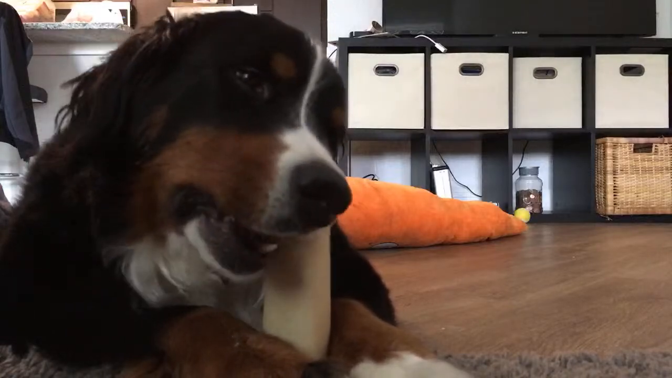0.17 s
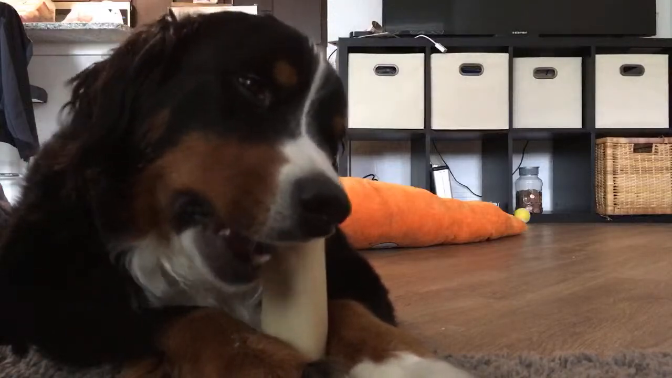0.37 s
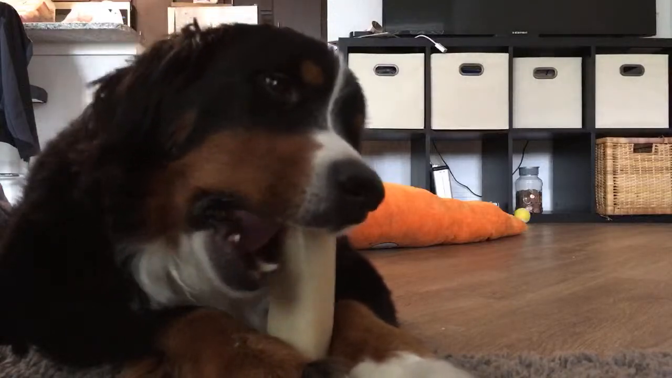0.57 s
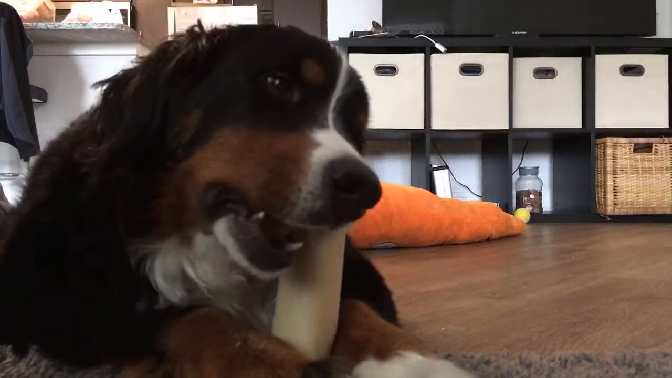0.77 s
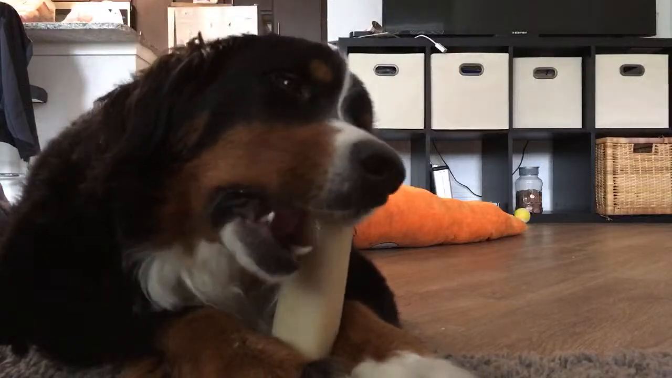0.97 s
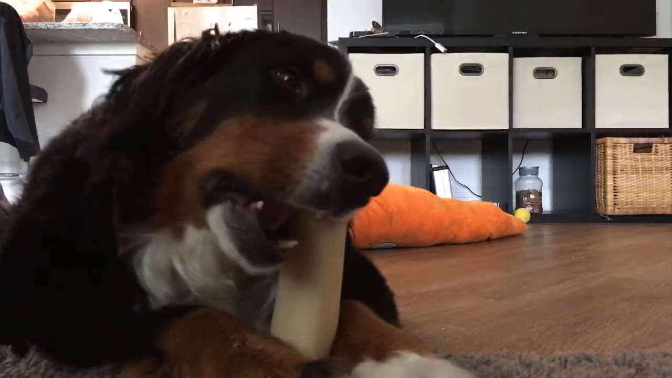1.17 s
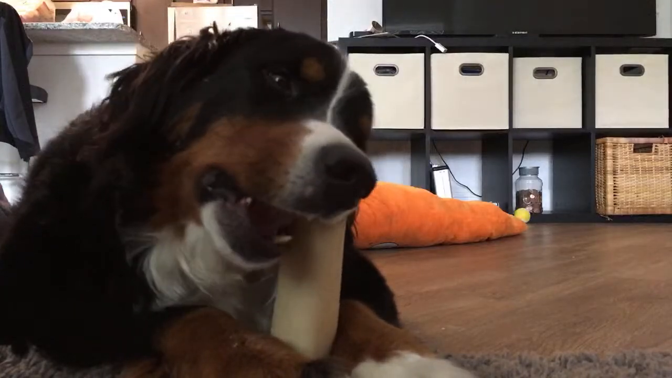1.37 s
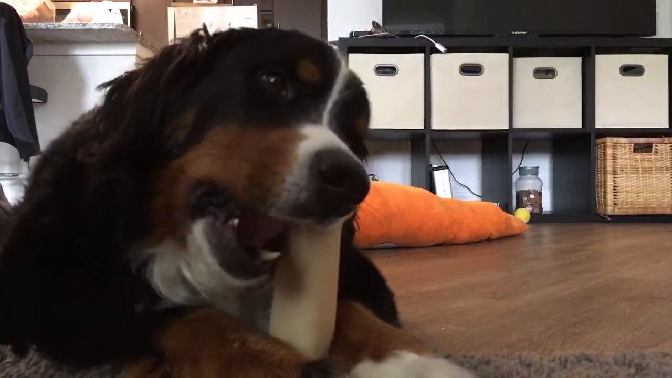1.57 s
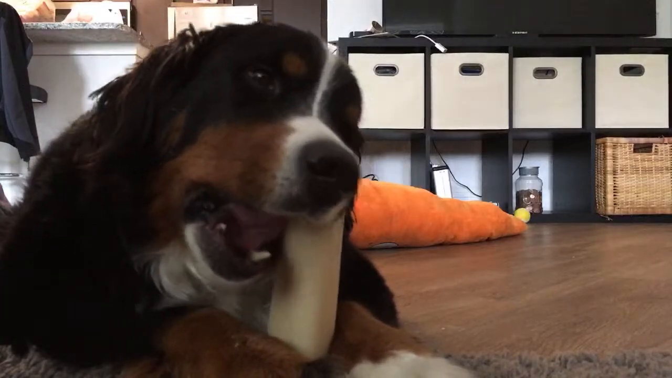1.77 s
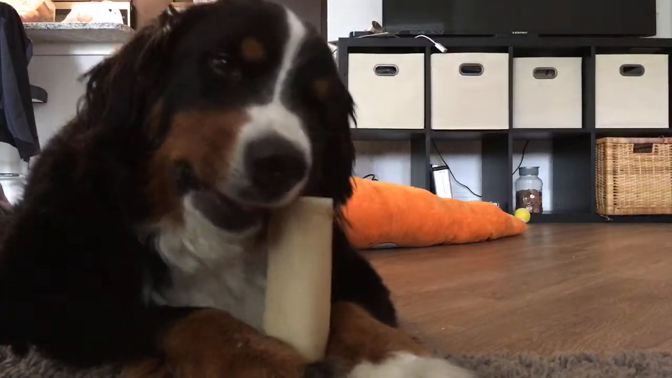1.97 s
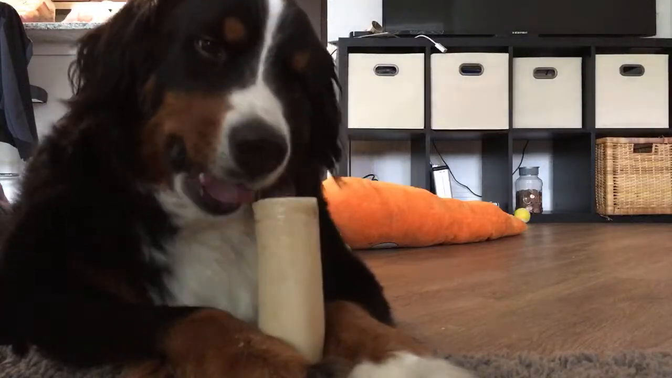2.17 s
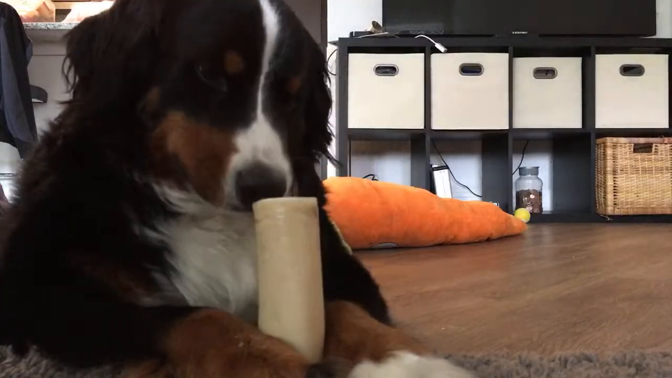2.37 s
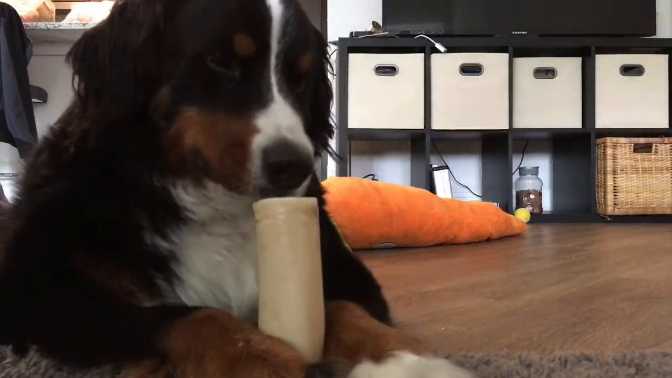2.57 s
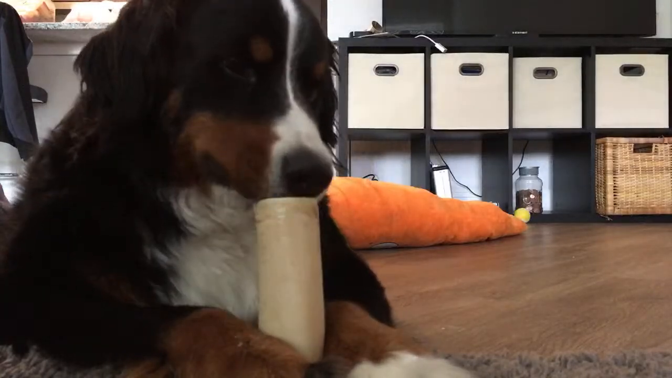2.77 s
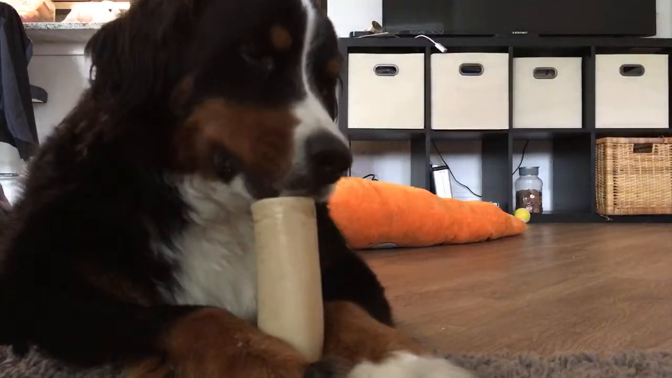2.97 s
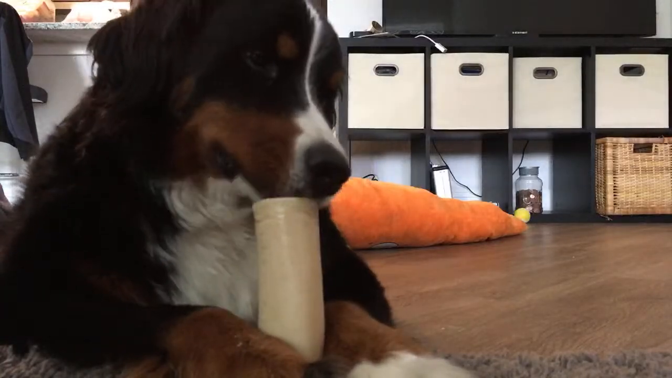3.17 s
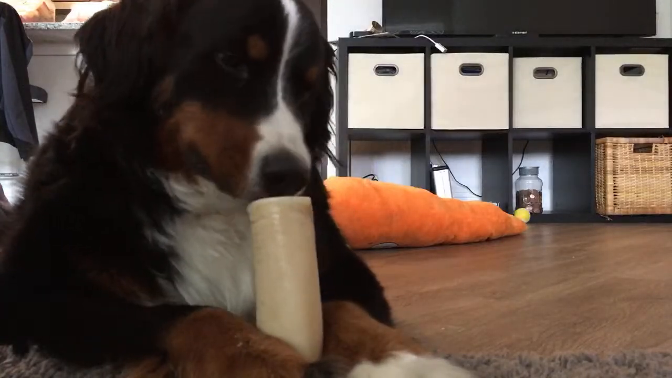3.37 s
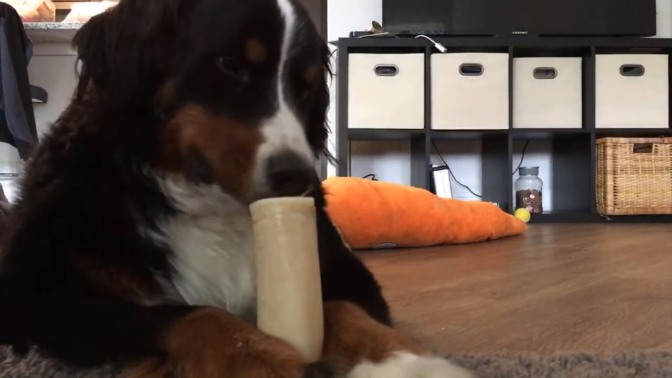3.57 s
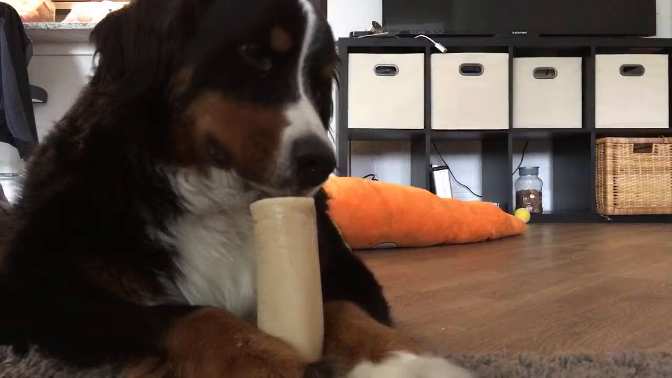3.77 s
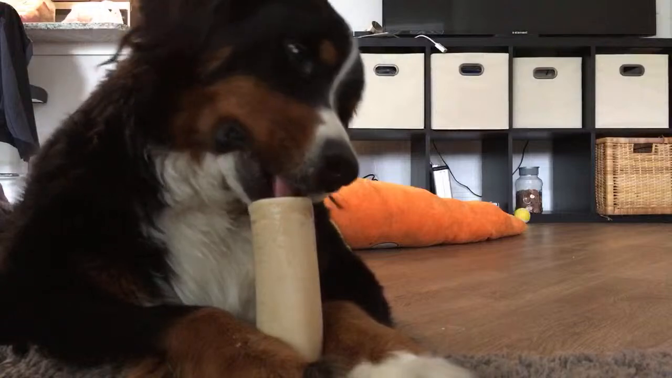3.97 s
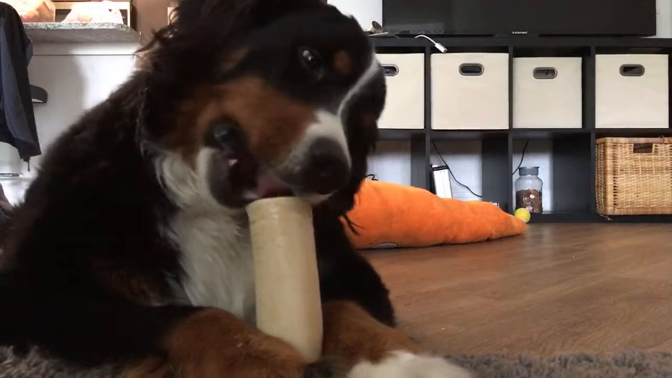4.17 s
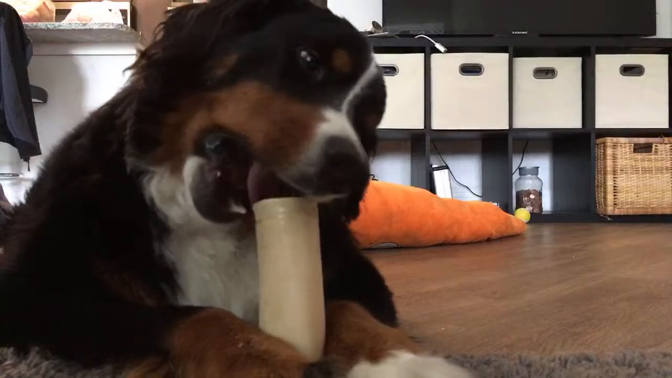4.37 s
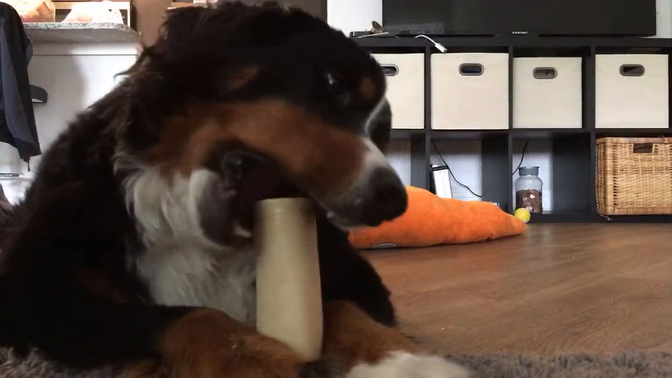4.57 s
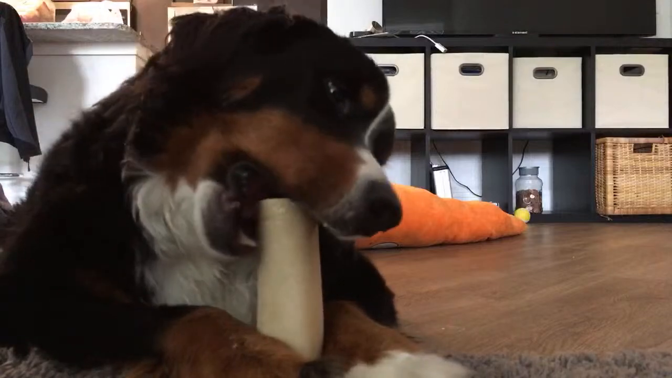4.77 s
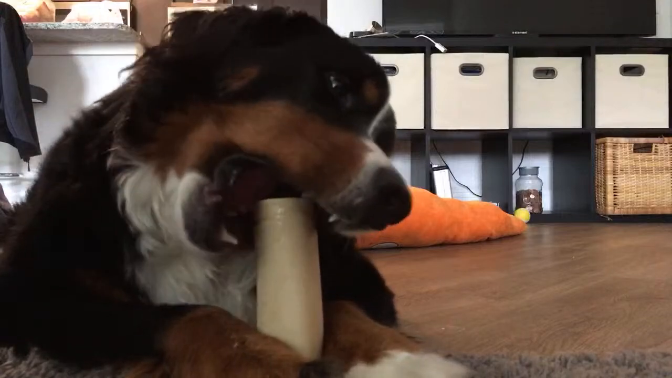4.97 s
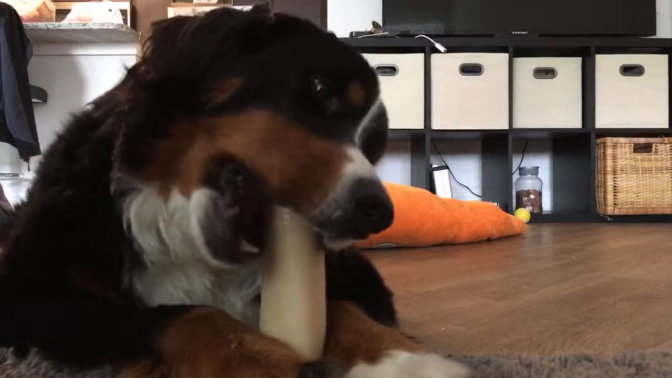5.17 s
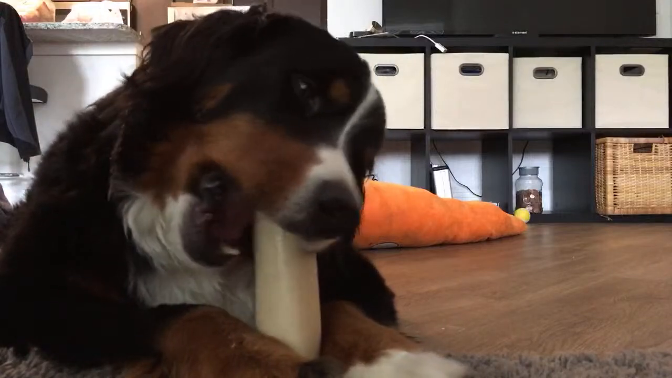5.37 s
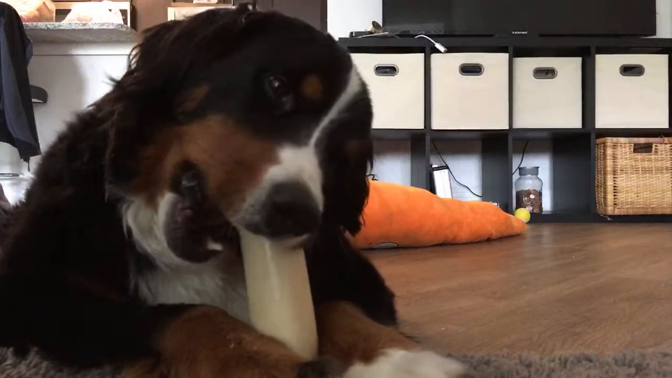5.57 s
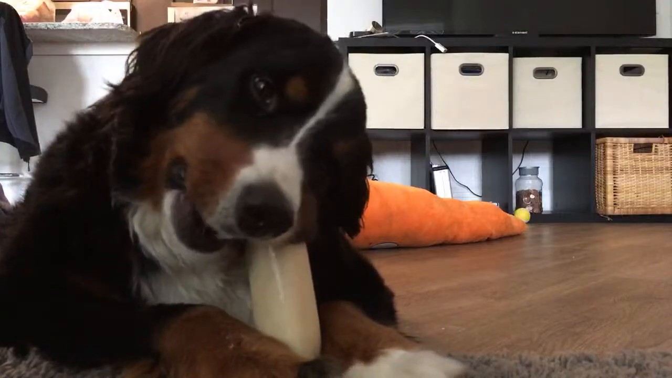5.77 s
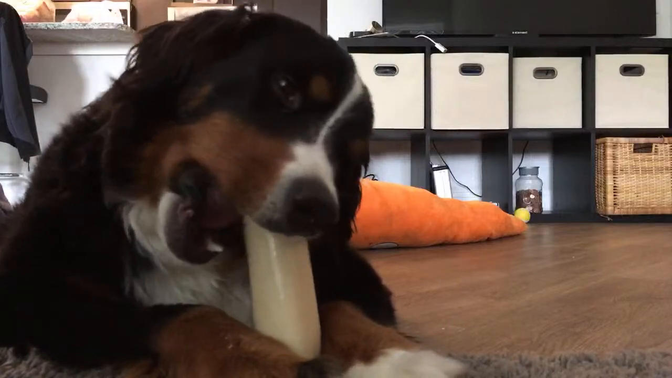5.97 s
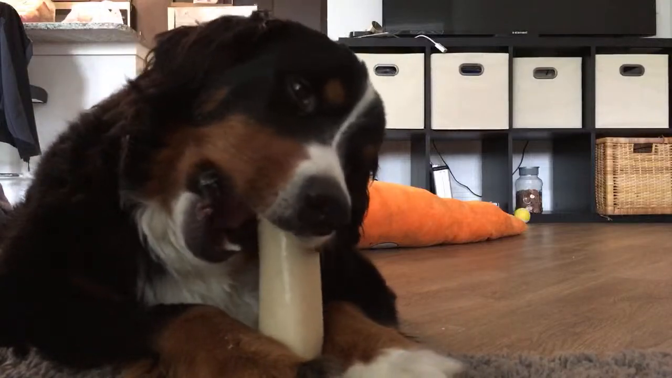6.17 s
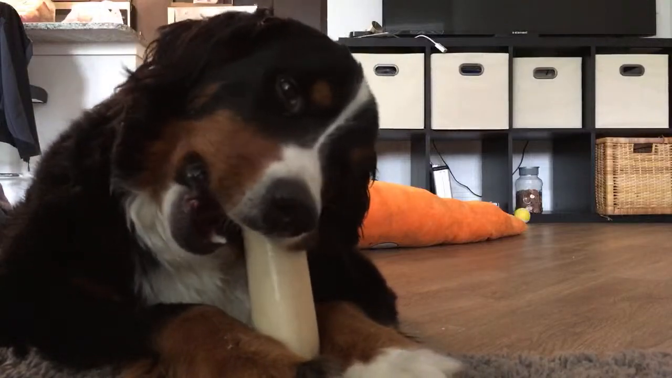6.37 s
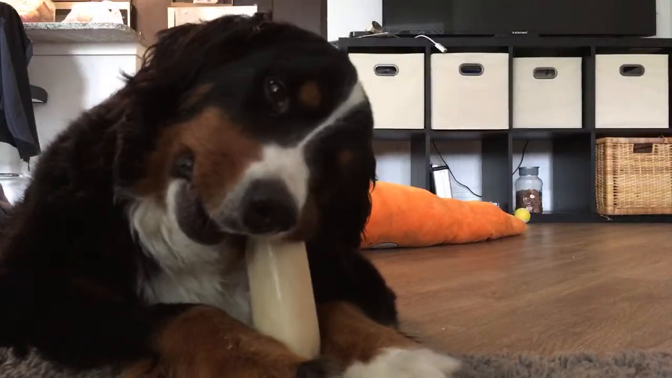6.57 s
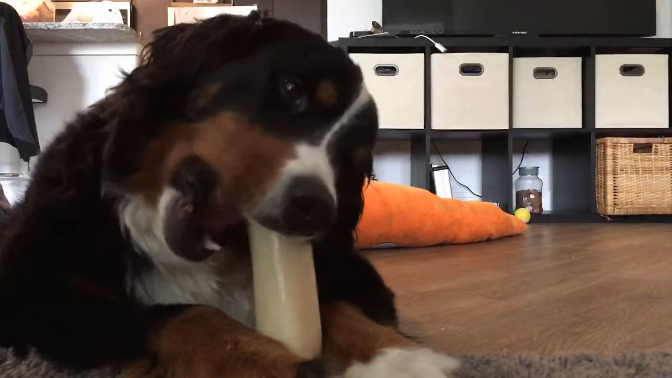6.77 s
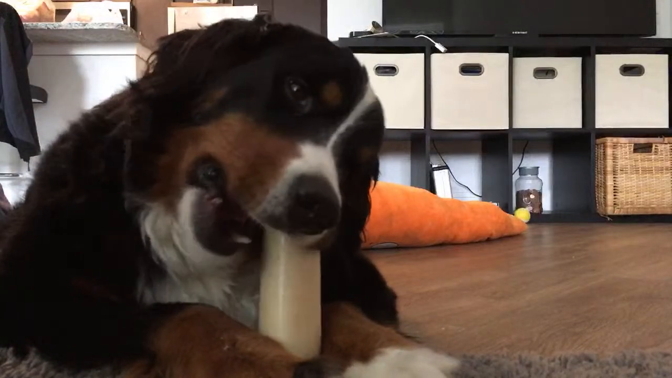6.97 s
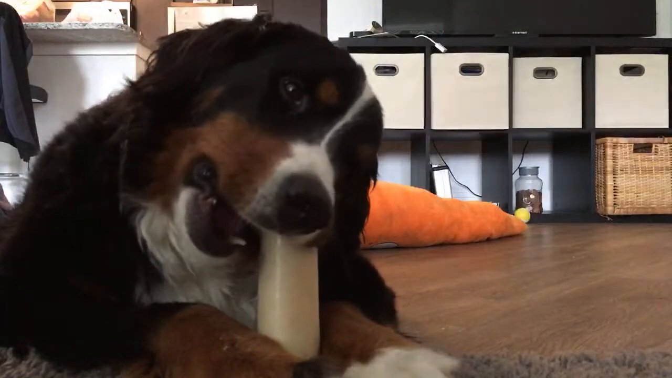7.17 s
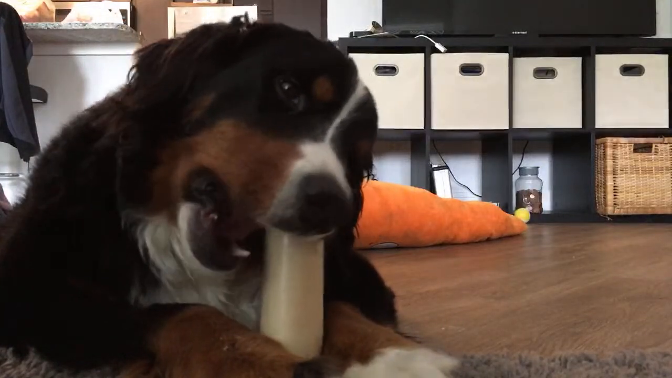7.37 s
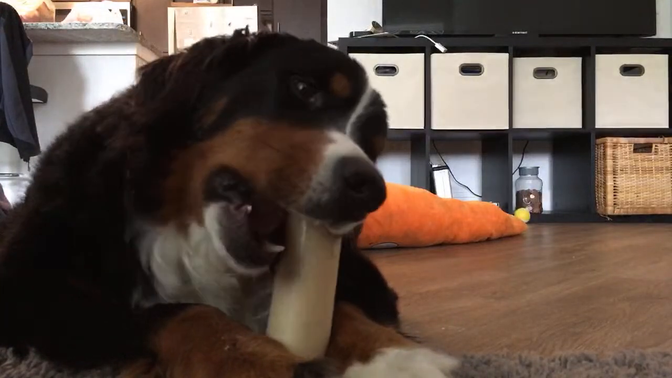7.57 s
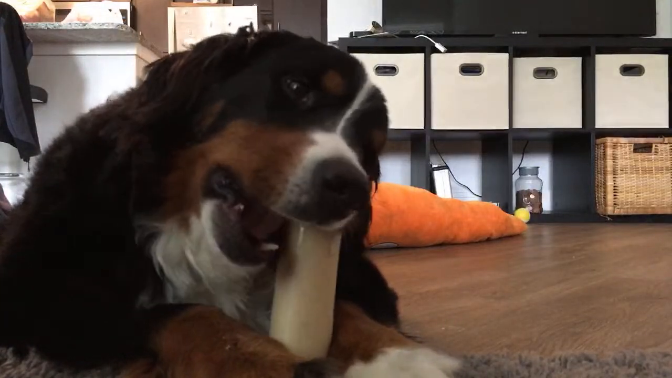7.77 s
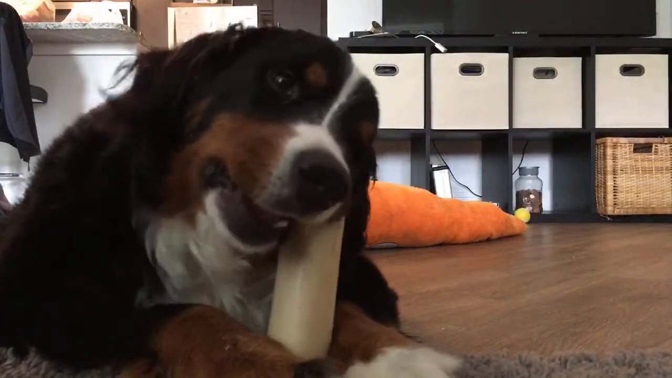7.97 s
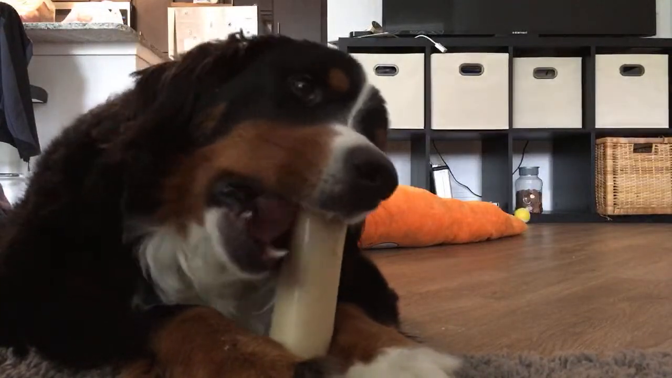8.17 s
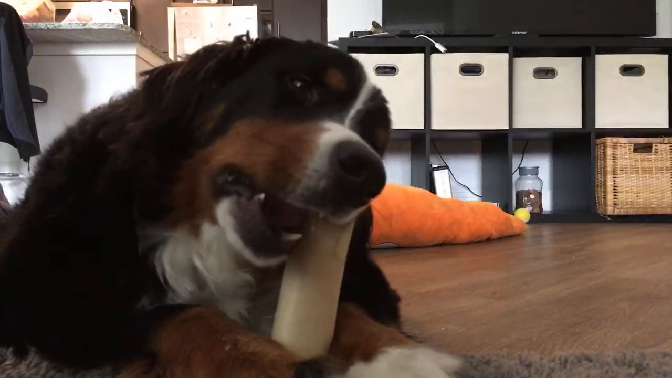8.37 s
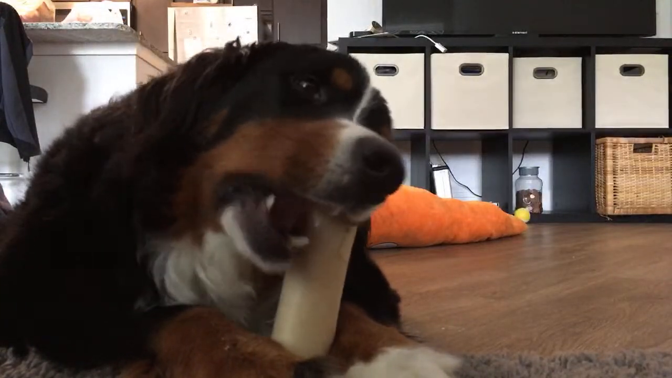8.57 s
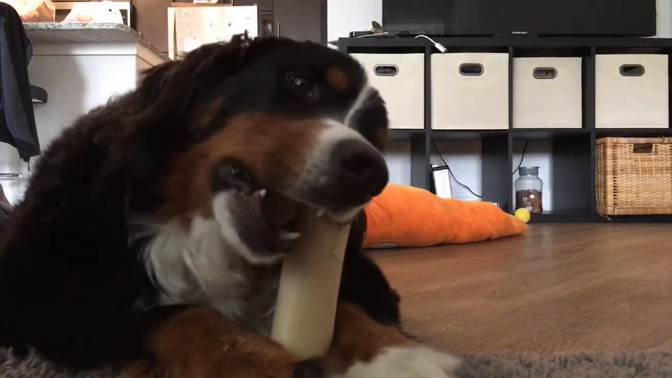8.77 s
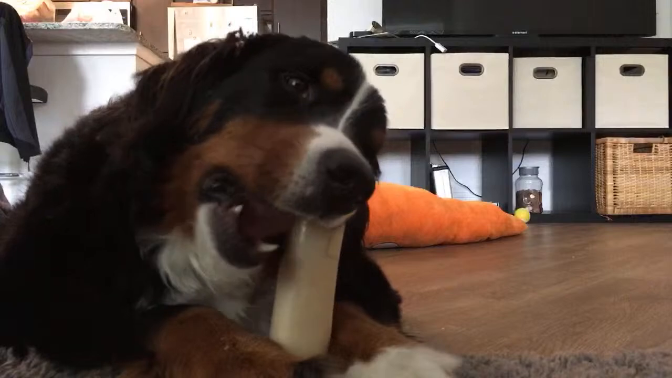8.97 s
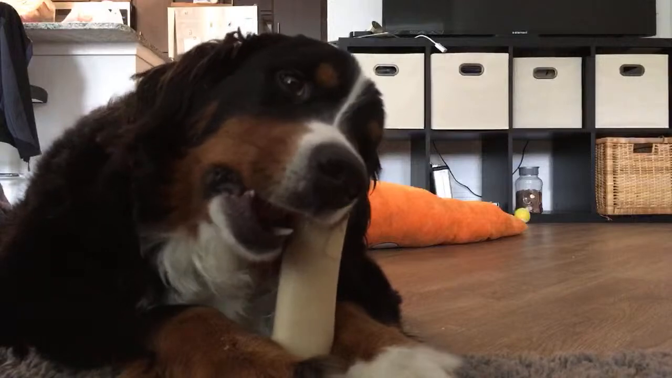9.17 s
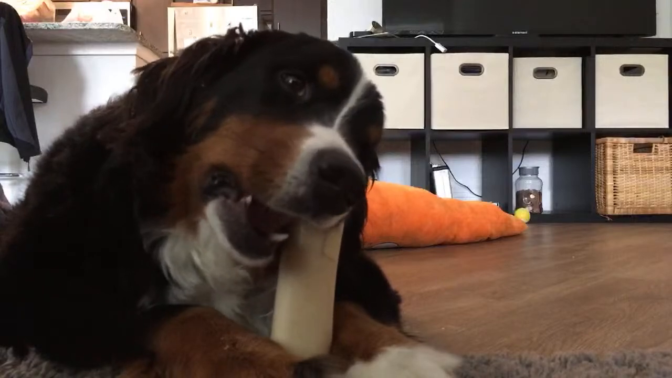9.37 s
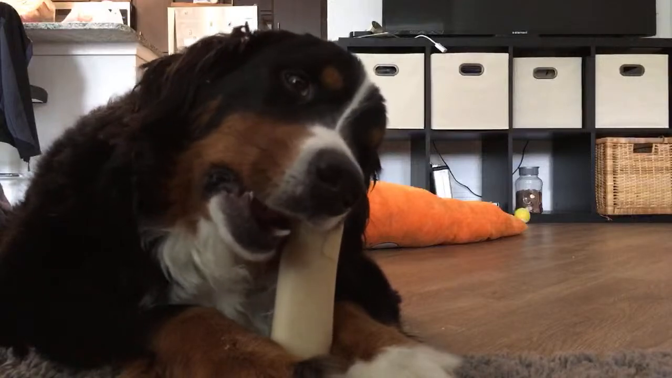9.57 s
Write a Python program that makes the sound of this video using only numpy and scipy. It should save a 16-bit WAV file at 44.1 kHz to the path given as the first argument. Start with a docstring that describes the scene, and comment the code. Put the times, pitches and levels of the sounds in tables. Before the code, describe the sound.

Over a steady low appliance hum and thin microphone hiss, a dog works at a chew bone in a slightly echoing room. Small tooth clicks and scrapes lead to a sharp crack, then quieter licking and lip smacks. The gnawing picks up with hollow knocks and soft bumps on the floor, until a second, louder crunching crack, after which everything is a little quieter.

```python
"""Dog gnawing a chew bone.

A big dog on a living-room floor gnaws a hard, hollow bone. Teeth scrape, click and knock, the wet mouth
smacks, and twice the bone cracks: bursts of tiny slips and fractures, coloured by its resonances. Jolts
ring the floor and the room echoes. An appliance hums; the microphone's electronics hiss and tick faintly.
The level dips briefly once, and gain control ducks after the loudest crack."""
import sys
import numpy as np
from scipy import signal
from scipy.fft import rfft, irfft, next_fast_len
from scipy.io import wavfile
from scipy.ndimage import uniform_filter1d

SR = 44100
rng = np.random.default_rng(int(sys.argv[2]) if len(sys.argv) > 2 else 0)


def put_to_file(sound):
    """Save the sound as 16-bit audio at rate SR, in the file named by the first command-line argument."""
    columns = np.atleast_2d(sound).T  # one column per channel
    safe = np.clip(columns, -1, 1)
    whole_steps = np.round(safe * 32767)
    wavfile.write(sys.argv[1], SR, whole_steps.astype(np.int16))


N = 424683
TIME = np.arange(N) / SR

# appliance tones: freq_hz, rms_db
HUM_TONES = [(119.9, -54), (166.1, -42.5), (796.7, -77.5)]
# moving air: freq_hz, relative_density_db
AIR_SPECTRUM = [(25, -36.5), (45, -28), (62, -19.5), (82, -6), (102, -7), (150, 2), (210, -.5), (280, -7.5),
                (370, -14.5), (470, -23), (1100, -31), (2200, -37), (5000, -46), (15000, -62.5)]
# electronic hiss: freq_hz, relative_density_db
HISS_SPECTRUM = [(1500, -20.5), (4000, -11.5), (7800, -19.5), (8400, -2), (11000, 2.5), (12500, -5.5),
                 (14200, -8.5), (15600, -4.5)]
# bone resonances: freq_hz, width_hz, boost_db
BONE_MODES = [(685, 130, 4), (1063, 270, 7.5), (1335, 40, 4.5), (2340, 110, 5), (3570, 230, 5.5),
              (4250, 300, 2), (6420, 160, 1), (8436, 230, 4), (8950, 450, 7.5), (9680, 300, 6.5)]
# knock, snap and splinter bands: low_hz, high_hz
CONTACT_BANDS = [(450, 2000), (2000, 7500), (7900, 13000)]
# tooth sliding on the bone: start_s, length_s, relative_db, pitch_hz
TOOTH_SCRAPES = [(0, 0.06, -56, 2970), (.414, 0.049, -57.5, 3700), (.807, 0.046, -63.5, 4300),
                 (3.668, 0.041, -63, 5600), (5.802, .035, -59, 3760), (6.063, 0.062, -64.5, 3620),
                 (7.949, 0.026, -41, 2670), (8.663, .04, -67.5, 6000)]
# tongue and lips sliding: start_s, length_s, relative_db, pitch_hz
WET_LICKS = [(2.02, 0.021, -59.5, 6970), (3.099, 0.21, -59.5, 2790), (3.21, 0.083, -57, 4500),
             (5.52, .06, -65.5, 13900), (9.095, 0.073, -61, 13500), (9.507, .11, -61.5, 13500)]
# jaw activity: time_s, gain_db
JAW_EFFORT = [(0, -1), (1.5, -1), (1.9, -4), (2.7, -1), (4.3, -6.5), (4.8, -2), (6.3, -1.5), (7.3, -4.5),
              (9.63, -3)]
# tooth slipping on the rim: start_s, relative_db, pitch_hz, splinter_offset_db
RIM_CLICKS = [(0.2327, -52, 3130, 1), (0.421, -60.5, 3620, 7), (.4365, -46, 3630, -4),
              (0.4656, -61, 4610, -14), (1.1487, -63, 5560, 1), (1.371, -61, 4320, -8.5),
              (2.856, -60.5, 3230, 0), (3.0398, -60, 3210, -5), (3.4714, -61, 3620, -5),
              (3.698, -57, 5733, 0), (4.7084, -61, 4690, -8), (4.8151, -57, 2930, 0),
              (5.038, -59, 3300, -3), (5.6079, -60.5, 3790, 4), (5.8198, -55.5, 3790, -10),
              (6.1015, -59.5, 4940, 3), (6.5764, -61.5, 3700, 1), (6.964, -52.5, 3890, -11),
              (7.1057, -53.5, 3595, -8), (7.6785, -52, 3620, -20), (7.806, -58, 3000, -5),
              (8.3398, -61.5, 4520, -1.5), (8.8443, -47, 3600, -25.5), (9.259, -56, 3620, -3)]
# back tooth on the hollow shaft: start_s, relative_db, pitch_hz
SHAFT_KNOCKS = [(0.4492, -52, 716), (1.2346, -54.5, 1207), (5.1174, -54, 880), (5.127, -62, 930),
                (5.2357, -52.5, 564), (6.1297, -44.5, 754), (6.8952, -45, 607), (6.9112, -54, 690),
                (7.6224, -47.5, 855), (8.2661, -50, 870), (8.6066, -53, 1900), (8.8367, -48.5, 884)]
# two runs of fractures: start_s, crumble_s, pitch_hz, knock_db, snap_db, splinter_db
BONE_CRACKS = [(1.484, 0.00071, 8730, -34.5, -18, -12), (1.486, 0.001, 2430, -26.5, -20.5, -24),
               (1.4877, 0.001, 990, -33, -43, -27.5), (7.944, 0.003, 2720, -34, -27, -32.5),
               (7.9492, 0.0017, 2490, -41, -54, -33.5), (7.9567, 0.0022, 5900, -39.5, -39, -39),
               (7.9999, 0.0011, 3650, -49, -46, -51), (8.0168, .0014, 2090, -42, -53, -48.5)]
# lips and tongue smacking: start_s, relative_db
WET_SMACKS = [(2.2335, -60), (3.1049, -51), (3.1557, -49), (3.193, -49.5), (4.3658, -58), (4.6731, -58),
              (5.5166, -56), (5.814, -37.5), (7.0438, -54.5), (8.1529, -55.5)]
# bone shifting against paws and floor: start_s, impulse_db, push_s
BONE_SHOVES = [(.245, -14, .014), (1.156, -19, 0.0098), (1.234, -29.5, 0.0035), (1.251, -23, 0.011),
               (1.4874, -16.5, 0.0032), (5.819, -33, .0011), (7.9475, -6, 0.004), (7.965, -21, 0.00308),
               (7.993, -30.5, 0.0023), (8.019, -28, 0.0027), (8.845, -28.5, 0.0027), (9.271, -29.5, 0.0072)]
# floor resonances: freq_hz, gain_db, t60_s
FLOOR_RESONANCES = [(87, -18.5, 0.25), (150.7, -9.5, 0.11), (207.7, -1, 0.1), (251, -12.5, 0.25),
                    (347, -10.5, .05), (532, -13.5, 0.04)]
# room's diffuse tail: freq_hz, gain_db, t60_s
ROOM_TAIL = [(100, -11, .3), (300, -9, 0.32), (1100, -2.5, 0.37), (2500, -13, 0.47), (4960, -13, 0.53),
             (7000, -15.5, .42), (9500, -16.5, 0.29), (15000, -19, 0.33)]
# brief level dip: time_s, gain_db
LEVEL_DIP = [(6.3, 1), (6.33, -4), (6.358, -13.5), (6.37, 1)]

# band offsets by kind of contact: knock_db, snap_db, splinter_db
SCRAPE_COLOUR_DB, LICK_COLOUR_DB = (1.5, 0, -8), (-12, -11, 0)
CLICK_COLOUR_DB, KNOCK_COLOUR_DB, SMACK_COLOUR_DB = (-1.5, -0.5, -0.5), (0, -11.5, -18), (-26, -14, -1.5)


def from_db(db):
    return 10 ** (np.asarray(db) / 20)


def unit_rms(x):
    return x / np.sqrt(np.mean(x ** 2) + 1e-20)


def at_time(rows, time_s=TIME):
    return np.interp(time_s, *np.transpose(rows))


def at_hz(rows, hz, column=1):
    rows = np.array(rows)
    return np.interp(np.log(hz + 1e-9), np.log(rows[:, 0]), rows[:, column])


def bandpass(x, low_hz, high_hz, order=2):
    return signal.sosfilt(signal.butter(order, [low_hz, high_hz], "band", fs=SR, output="sos"), x)


def resonance(x, hz, width_hz):
    """Two-pole resonator, unity peak gain."""
    radius = np.exp(-np.pi * width_hz / SR)
    feedback = [1, -2 * radius * np.cos(2 * np.pi * hz / SR), radius ** 2]
    return signal.lfilter(np.array([1, 0, -1]) * (1 - radius ** 2) / 2, feedback, x + 1e-18)


def noise(spectrum):
    """Steady coloured noise, rms 1."""
    size = next_fast_len(N)
    gain = from_db(at_hz(spectrum, np.fft.rfftfreq(size, 1 / SR)))
    return unit_rms(irfft(rfft(rng.standard_normal(size)) * gain, size)[:N])


def drift(knots_per_s):
    """Slow random curve, spread near 1."""
    knots = rng.standard_normal(int(N / SR * knots_per_s) + 2)
    return np.interp(TIME * knots_per_s, np.arange(len(knots)), knots)


def add(out, start_s, sound):
    start = max(0, round(start_s * SR))
    out[start:start + len(sound)] += sound[:max(0, N - start)]


def appliance(waver_db=1.0, wander_rad=0.2, air_db=-47):
    """Motor and mains tones waver over the rumble of moving air."""
    hum = np.zeros(N)
    for hz, rms_db in HUM_TONES:
        amplitude = np.sqrt(2) * from_db(rms_db + waver_db * drift(5.5))
        hum += amplitude * np.sin(2 * np.pi * hz * TIME + wander_rad * drift(3.4))
    return hum + from_db(air_db) * noise(AIR_SPECTRUM)


def electronics(hiss_db=-68.5, tick_db=-72, pairs_per_s=29.97, gap_s=0.0034, jitter_s=0.00053):
    """Thin hiss and uneven pairs of tiny ticks."""
    ticks = np.zeros(N)
    for pair_s in np.arange(0.031, N / SR, 1 / pairs_per_s):
        for lag_s, db in (0, 0), (gap_s, -3):
            start_s = pair_s + lag_s + jitter_s * rng.standard_normal()
            add(ticks, start_s, from_db([db + 2 * rng.standard_normal()]))
    ticks = unit_rms(bandpass(ticks + 1e-18, 10000, 12500))
    return from_db(hiss_db) * noise(HISS_SPECTRUM) + from_db(tick_db) * ticks


def micro_slips(size, slips_per_s, spread_db=0.0):
    """Tiny slips as random impulses; spread makes a few much stronger."""
    strength = from_db(spread_db * np.minimum(rng.exponential(1, size), 4))
    polarity = rng.choice([-1, 1], size)
    return strength * polarity * (rng.random(size) < slips_per_s / SR)


def bone(force, vary_db=4.0):
    """Bone resonances colour the force, differently at each spot."""
    for hz, width_hz, boost_db in BONE_MODES:
        gain = from_db(boost_db + vary_db * rng.standard_normal())
        force = force + (gain - 1) * resonance(force, hz, width_hz)
    return force


def contact(force, pitch_hz, bands_db, window_s, pitch_gain=2.6, q=10.0):
    """Stiffness gives a contact its pitch; place and force set each band's rms over window_s."""
    ringing = bone(force + pitch_gain * resonance(force, pitch_hz, pitch_hz / q))
    out = np.zeros(len(force))
    for (low_hz, high_hz), db in zip(CONTACT_BANDS, bands_db):
        part = bandpass(ringing, low_hz, high_hz, order=3)
        out += part * from_db(db) * np.sqrt(window_s * SR / (np.sum(part ** 2) + 1e-20))
    return out


def scrapes_and_licks(trim_db=-6.5, slips_per_s=2500):
    """A sliding tooth or tongue makes a swell of tiny slips."""
    out, t = np.zeros(N), TIME[:SR // 5]
    for slides, colour_db in (TOOTH_SCRAPES, SCRAPE_COLOUR_DB), (WET_LICKS, LICK_COLOUR_DB):
        for start_s, length_s, db, pitch_hz in slides:
            swell = np.sqrt(np.abs(np.sin(np.pi * np.minimum(t / length_s, 1))))
            force = swell * micro_slips(len(t), slips_per_s)
            add(out, start_s, contact(force, pitch_hz, np.add(db, colour_db), length_s))
    return from_db(trim_db) * out


def nibbling(base_db=-72, ticks_per_s=90):
    """Faint, dull tooth ticks, louder as the jaw works harder."""
    ticks = bandpass(bone(micro_slips(N, ticks_per_s, spread_db=2.0)), 450, 2200)
    return from_db(base_db + at_time(JAW_EFFORT)) * unit_rms(ticks)


def light_clicks(base_db=-66, spread_db=5.5, pitch_hz=3800, spread_octaves=0.3, count=14):
    """Random light tooth slips, scaled by jaw effort; rows as in RIM_CLICKS."""
    starts_s = (np.arange(count) + rng.random(count)) / count * N / SR
    level_draw, pitch_draw = rng.standard_normal((count, 2)).T
    levels_db = base_db + at_time(JAW_EFFORT, starts_s) + spread_db * np.clip(level_draw, -1, 1)
    pitches_hz = pitch_hz * 2 ** (spread_octaves * pitch_draw)
    return [(start_s, db, hz, -3) for start_s, db, hz in zip(starts_s, levels_db, pitches_hz)]


def sudden_contacts(click_s=0.0019, knock_s=0.0026, smack_s=0.0009, smack_hz=8630):
    """Each kind has its own decay and colour. Rows: start_s, crumble_s, pitch_hz, bands_db."""
    clicks = [(start_s, click_s, hz, np.add([db, db, db + splinter_db], CLICK_COLOUR_DB))
              for start_s, db, hz, splinter_db in RIM_CLICKS + light_clicks()]
    knocks = [(start_s, knock_s, hz, np.add(db, KNOCK_COLOUR_DB)) for start_s, db, hz in SHAFT_KNOCKS]
    cracks = [(start_s, crumble_s, hz, bands_db) for start_s, crumble_s, hz, *bands_db in BONE_CRACKS]
    smacks = [(start_s, smack_s, smack_hz, np.add(db, SMACK_COLOUR_DB)) for start_s, db in WET_SMACKS]
    return cracks + knocks + smacks + clicks


def bites(contacts, trim_db=-1.0, rise_s=0.00023, slip_force=1.56):
    """One sudden slip plus a burst of micro-fractures, gone within milliseconds."""
    out, t = np.zeros(N), TIME[:SR // 20]
    for start_s, crumble_s, pitch_hz, bands_db in contacts:
        decay_s = 0.93 * crumble_s
        force = rng.standard_normal(len(t)) * (1 - np.exp(-t / rise_s)) * np.exp(-t / decay_s)
        add(force, rise_s, [slip_force])
        add(out, start_s, contact(force, pitch_hz, bands_db, window_s=0.005))
    return from_db(trim_db) * out


def floor_thumps(jolt_db=10, jolt_s=0.0012):
    """Shoves and tooth jolts ring the floor through the bone; slow pushes stir only the low modes."""
    force, out = np.zeros(N), np.zeros(N)
    jolts = [(start_s, db + jolt_db, jolt_s) for start_s, db, *_ in SHAFT_KNOCKS + RIM_CLICKS]
    for start_s, db, push_s in BONE_SHOVES + jolts:
        push = np.sin(np.pi * np.minimum(TIME[:SR // 50] / push_s, 1)) ** 2
        add(force, start_s, from_db(db) * push / push.sum())
    for hz, db, t60_s in FLOOR_RESONANCES:
        radius = from_db(-60 / (t60_s * SR))
        pole_real = radius * np.cos(2 * np.pi * hz / SR)
        out += from_db(db) * signal.lfilter([1, -pole_real], [1, -2 * pole_real, radius ** 2], force + 1e-18)
    return bandpass(out, 78, 700, order=4)


def room(x, wall_s=0.019, wall_db=-26, build_s=0.003):
    """One wall echo in a diffuse tail that lasts longest in the low treble."""
    t, edges_hz = TIME[:SR * 2 // 3], np.geomspace(60, 16000, 13)
    response = np.zeros(len(t))
    onset = np.clip(t / build_s, 0, 1) ** 2
    for low_hz, high_hz in zip(edges_hz, edges_hz[1:]):
        hz = np.sqrt(low_hz * high_hz)
        fade = onset * from_db(-60 * t / at_hz(ROOM_TAIL, hz, column=2))
        reflections = bandpass(rng.standard_normal(len(t)), low_hz, high_hz)
        response += from_db(at_hz(ROOM_TAIL, hz)) * reflections * fade / np.sqrt(np.sum(fade ** 2))
    response[round(wall_s * SR)] += from_db(wall_db)
    return signal.fftconvolve(x, response)[:N]


def gnawing(contacts):
    """Teeth and mouth on the bone, as radiated in one direction."""
    return bites(contacts) + scrapes_and_licks()


def gain_control(x, threshold_db=-9.5, slope=0.69, release_db_per_s=0.48):
    """A loud peak cuts the gain at once; it creeps back over seconds."""
    power = uniform_filter1d(x[0] ** 2, size=32)
    level_db = 10 * np.log10(np.maximum(power, 1e-12))
    cut_db = slope * np.maximum(level_db - threshold_db, 0)
    release_db = release_db_per_s * TIME
    held_db = np.maximum.accumulate(cut_db + release_db) - release_db
    return x * from_db(-held_db)


def scene(directions=3):
    """Dog over hum and hiss. The bone's colour varies with direction; the echo blends several."""
    background = appliance() + electronics()
    dull = nibbling() + floor_thumps()
    contacts = sudden_contacts()
    echo = sum(room(gnawing(contacts)) for _ in range(directions)) / np.sqrt(directions)
    dog = gnawing(contacts) + echo + dull + room(dull)
    return (dog + background)[None] * from_db(at_time(LEVEL_DIP))


def record(dry, cutoff_hz=15500):
    """Gain control, full-scale clip, steep low-pass."""
    clipped = np.clip(gain_control(dry), -1, 1)
    return signal.sosfilt(signal.ellip(10, 0.1, 80, cutoff_hz, fs=SR, output="sos"), clipped)


dry = scene()
out = record(dry)
put_to_file(out)
```